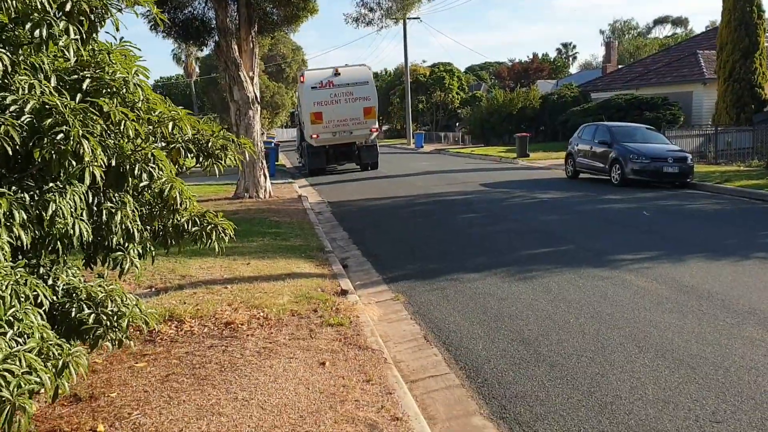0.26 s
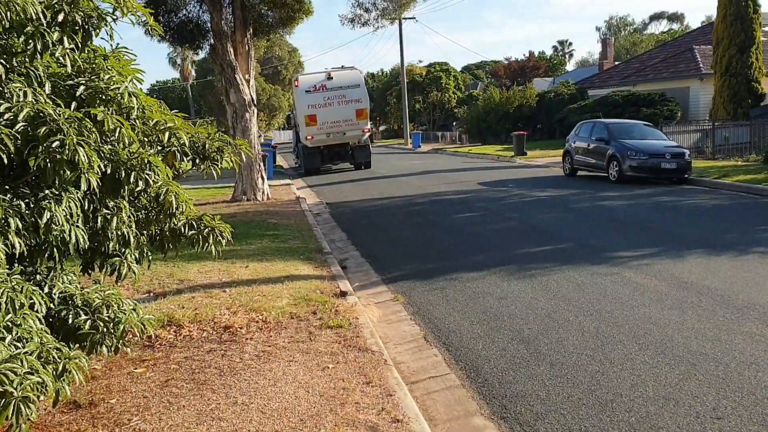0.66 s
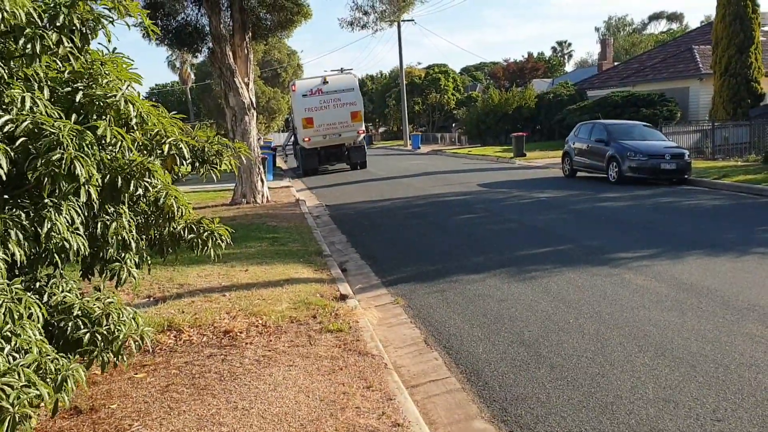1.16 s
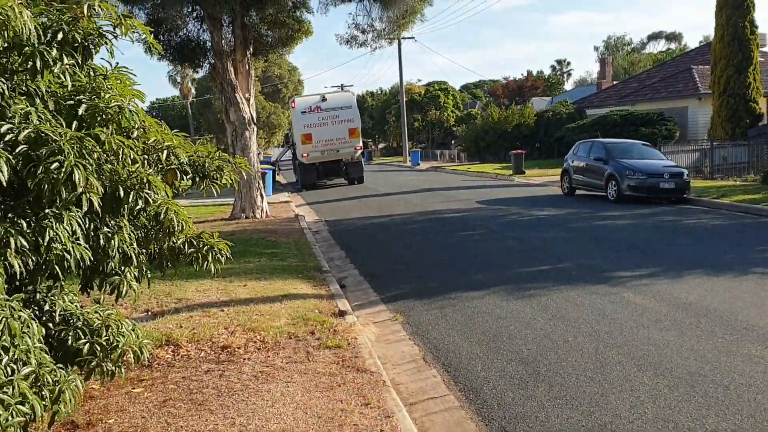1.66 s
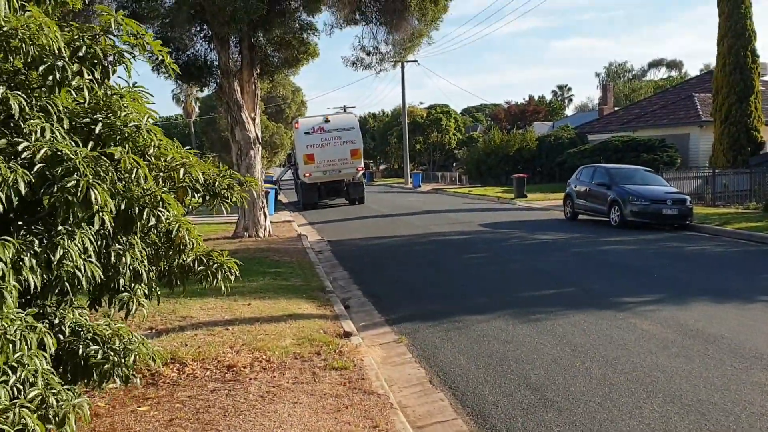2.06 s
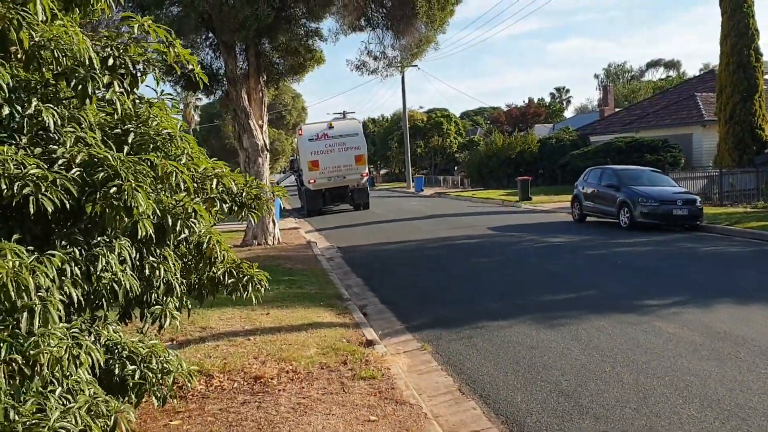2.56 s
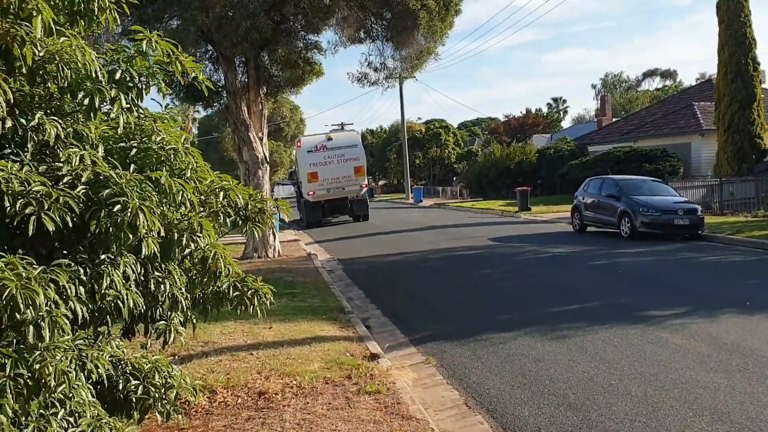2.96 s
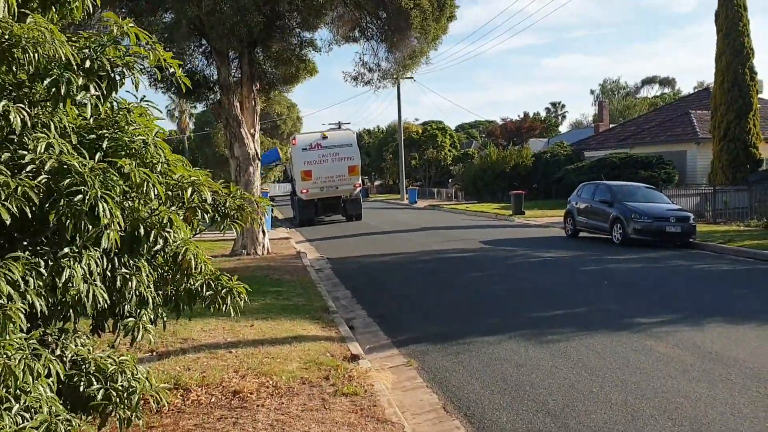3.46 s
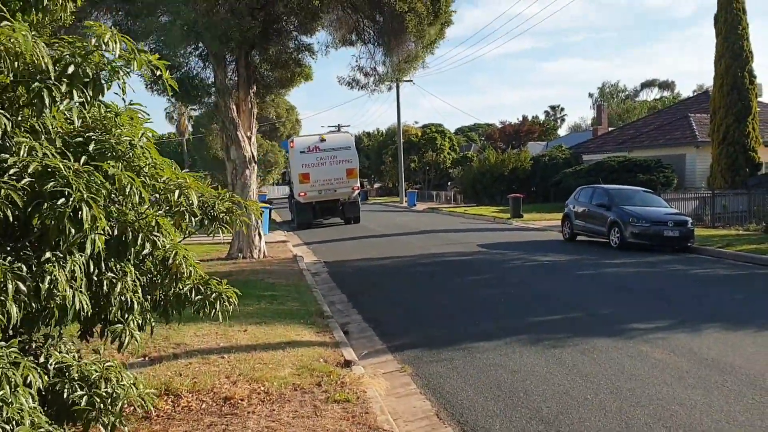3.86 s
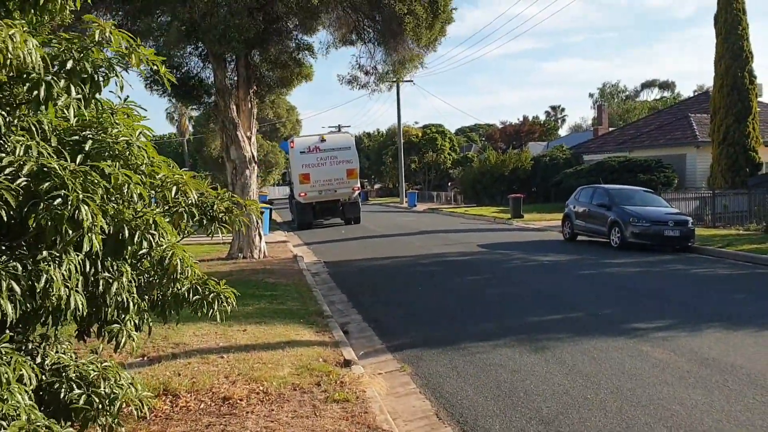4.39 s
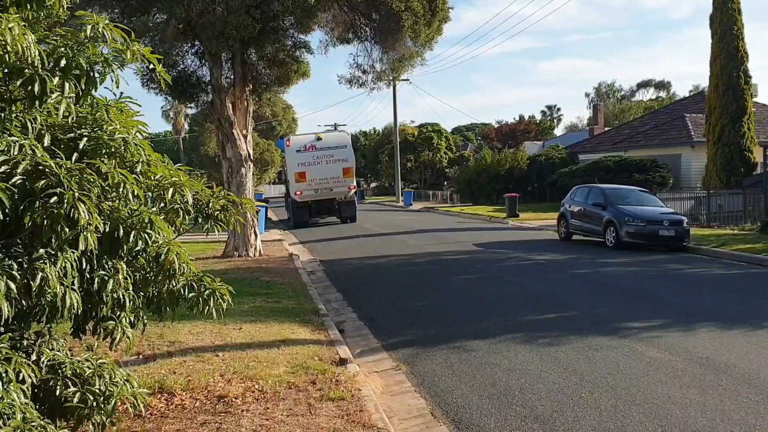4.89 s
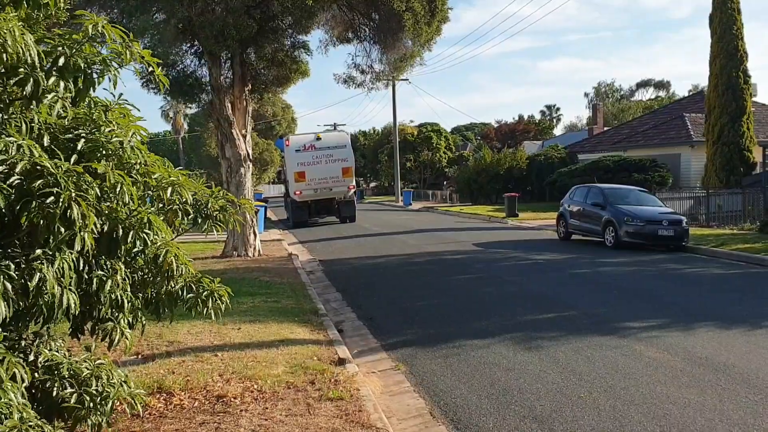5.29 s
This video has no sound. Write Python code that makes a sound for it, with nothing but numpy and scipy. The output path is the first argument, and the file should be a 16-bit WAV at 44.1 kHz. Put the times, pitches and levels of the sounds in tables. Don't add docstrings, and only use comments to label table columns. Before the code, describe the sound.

A refuse truck drops to a diesel idle with thin brake squeals, then its arm clunks a bin, air rushes and a load tumbles into steel.

```python
import sys
import numpy as np
from scipy import signal
from scipy.fft import rfft, irfft, next_fast_len
from scipy.io import wavfile
from scipy.ndimage import uniform_filter1d, map_coordinates

SR = 44100
rng = np.random.default_rng(int(sys.argv[2]) if len(sys.argv) > 2 else 0)


def output_pcm(signal):
    pcm = np.clip(np.atleast_2d(signal).T, -1, 1) * 32767
    wavfile.write(sys.argv[1], SR, np.round(pcm).astype(np.int16))


def voltage_ratio(decibels):
    exponent = np.asarray(decibels, float) / 20
    return 10 ** exponent


N = 243856

# time in seconds, firing rate in Hz, level of the firing note in dB.
ENGINE_SPEED = [(0, 62.65, -39), (.3, 49.8, -49), (.55, 45.55, -40.5), (.7, 44.8, -42), (.82, 42.55, -66),
                (.97, 39.6, -41.5), (1.3, 38.6, -47), (1.55, 35.51, -53), (1.9, 36.02, -39),
                (2.4, 35.82, -45.5), (2.9, 35.9, -39), (3.25, 36.56, -37), (3.7, 37.05, -40.5),
                (4.2, 37.27, -42), (4.5, 37.4, -42), (4.95, 38.52, -38.5), (5.53, 37.96, -47)]
# time in seconds, engine load in dB, exhaust throb in dB.
ENGINE_LOAD = [(0, 5.5, -31.5), (.25, 1.5, -59), (.65, 1, -44), (.85, -1, -58), (1, 0.5, -39.5),
               (1.26, -0.5, -55.5), (1.52, 0, -40.5), (1.9, 1.5, -37), (2.05, 0, -46), (2.76, 4.5, -40),
               (2.95, 4.5, -34), (3.2, 3, -41), (3.5, 4, -35), (3.95, 3, -49), (4.11, 5.5, -44),
               (4.31, 5, -47), (5.05, 2.5, -43.5), (5.53, -1, -55)]
# multiple of the firing rate, level in dB.
UPPER_ORDERS = [(3, -54.5), (4, -51), (5, -63), (6, -54)]
# frequency in Hz, level in dB per Hz.
BOOM_COLOUR = [(53, 0), (90, 5.5), (167, 3.5), (226, -1.5), (262, -7), (325, -15), (420, -19), (550, -15),
               (920, -120)]
# time of full level in seconds, level in dB, then rise before it,
# hold and fall in seconds.
JOLTS = [(.2, -31.5, 0.18, 0.0091, 0.042), (.57, -37.5, 0.24, 0.0064, 0.037),
         (1.71, -35.5, 0.093, .01, 0.4), (2.15, -42, 0.092, 0.011, 0.091), (2.79, -39, 0.25, 0.0075, 0.067),
         (2.96, -28.5, 0.26, 0.0089, 0.059), (3.26, -25, 0.038, 0.0045, 0.11), (3.54, -30, 0.2, 0.04, 0.58),
         (4.04, -24.5, 0.019, 0.17, 0.072), (4.49, -25.5, 0.073, 0.046, 0.13),
         (4.71, -34, 0.069, 0.0044, 0.067), (5.3, -31, 0.18, 0.0085, 0.041),
         (5.41, -33.5, 0.07, 0.0092, 0.1)]
# frequency in Hz, level in dB per Hz.
CLATTER_COLOUR = [(180, -9), (300, 0.5), (476, -4.5), (619, 3), (957, -5), (1090, -4), (2030, -4.5),
                  (2970, -14.5), (3970, -18.5), (7000, -31), (9100, -27.5), (15400, -120)]
# frequency in Hz, width in Hz, level in dB.
BLOCK_MODES = [(736, 130, -9), (1101, 49, 2.5), (1510, 170, -1.5), (2020, 150, -4)]
# time in seconds, frequency in Hz, level in dB.
PUMP_WHINE = [(0, 2030, -67), (.55, 1990, -60), (1.2, 2040, -60.5), (1.45, 2130, -62), (1.8, 1940, -56.5),
              (2.1, 2030, -59.5), (2.43, 2180, -60), (2.75, 2110, -55), (3.2, 2100, -56), (4.2, 2070, -52),
              (5.53, 2150, -58)]
BOOM_DB, CLATTER_DB = -41.5, -46
BOOM_GROWS = 2.12

# time in seconds, frequency in Hz, level in dB.
SQUEALS = [
    [(.87, 7900, -72), (.888, 7905, -44), (.904, 7915, -41), (.93, 7945, -51), (.952, 7975, -38),
     (.968, 7985, -51), (.986, 7995, -46), (1, 7970, -60), (1.17, 8000, -80)],
    [(.96, 8720, -70), (.985, 8730, -56), (1.08, 8860, -52), (1.15, 8880, -49), (1.31, 8735, -63),
     (1.39, 8755, -54), (1.41, 8760, -64)],
    [(1.4, 8730, -64), (1.43, 8715, -47), (1.7, 8795, -56), (1.79, 8795, -53), (1.86, 8815, -63),
     (1.89, 8870, -54), (2, 8885, -65), (2.35, 9085, -63), (2.48, 9130, -75)],
]
# time of full level in seconds, level in dB, frequency in Hz, hold in seconds.
CHIRPS = [(1.3, -50, 8505, .02), (1.18, -55, 13205, .055), (1.31, -72, 10080, .17), (1.65, -73, 10090, .15),
          (.025, -62, 13970, .07), (.862, -52, 8150, .035), (1.36, -70, 11300, .05),
          (1.46, -70, 10080, .15), (2.21, -70, 9850, .04), (2.07, -72, 11450, .03), (1.95, -75, 8620, .15)]
# frequency in Hz, left-right difference in dB.
BRAKE_SEAT = [(7950, 10), (8500, 6), (8800, 4.5), (9100, 7), (13200, 11)]
# frequency in Hz, lead of the left side in radians.
BRAKE_LEAD = [(7950, -2.3), (8500, -1), (8800, -1.9), (9100, -.9), (13200, -2.4)]
SQUEAL_DB = 4.5
CHIRP_RISE_S, CHIRP_FALL_S = 0.018, 0.078

# time of full level in seconds, level in dB, then rise before it, hold and fall in
# seconds.
JETS = [(0, -58, .1, 0.14, 0.26), (.4, -53, 0.3, 0.0071, 0.038), (1.22, -64, 0.23, 0.011, 0.22),
        (1.38, -62, 0.11, 0.39, 0.15), (1.8, -59, 0.022, 0.0032, .04), (2.14, -66, 0.27, .15, .2),
        (2.39, -57, 0.13, 0.13, 0.59), (2.85, -61.5, .2, 0.094, 0.49), (3.16, -51, 0.02, 0.081, .1),
        (3.25, -41, 0.034, 0.0015, 0.03), (3.4, -38.5, 0.2, 0.55, 0.19), (3.48, -43, 0.12, 0.028, 0.37),
        (3.86, -43.5, 0.68, 0.015, 0.067), (4.0, -44, 0.19, 0.31, 0.76), (4.75, -46.5, 0.64, 0.55, 0.95)]
# time of full level in seconds, level in dB, then rise before it, hold and
# fall in seconds.
SPITS = [
    (3.57, -41, 0.15, .05, .12),
    (3.83, -41, 0.11, 0.041, .08),
]
# frequency in Hz, level in dB per Hz.
RUSH_COLOUR = [(1120, -57), (1900, -8), (2010, 2.5), (2400, -4), (5310, 2), (6940, -14), (7850, -12),
               (8600, -14), (9000, -33), (11700, -46), (19800, -120)]
# frequency in Hz, level in dB per Hz.
FIZZ_COLOUR = [(5000, -20), (8800, -5.5), (10700, -1), (11700, -0.5), (12600, -0.5), (13600, 5.5),
               (14100, -3), (14700, -4)]
# frequency in Hz, width in Hz, level in dB.
NOZZLE_MODES = [(2240, 41, -13), (2730, 79, 8), (3360, 220, 5.5), (3800, 460, 4), (5420, 330, -3),
                (6000, 190, -0.5)]
# frequency in Hz, width in Hz, level in dB.
SLIT_MODES = [(12100, 550, 1.5), (13300, 430, -7)]
# time of full level in seconds, level in dB, then rise before it, hold and fall in
# seconds.
PUFFS = [
    (1.35, -59, 0.045, 0.097, 0.17),
    (2.44, -54.5, 0.14, 0.012, .06),
    (2.57, -57, 0.35, 0.025, 0.22),
    (2.76, -66, .1, 0.13, 0.098),
]
# frequency in Hz, width in Hz, level in dB.
VALVE_MODES = [(2180, 71, 9.5), (2800, 640, -7.5), (5730, 33, -4), (7040, 510, -13), (10440, 2400, -19)]
# time of full level in seconds, level in dB, frequency in Hz, hold in seconds.
WHISTLES = [
    (1.34, -61.5, 3320, .11),
    (2.43, -59, 3400, .035),
    (2.52, -60, 3400, .11),
]
LEAK_DB, FIZZ_DB = -65, -4
FIZZ_GROWS = 1.08
WHISTLE_WET_DB = -10

# start in seconds, peak in dB, struck part in Hz, thud in dB, edge in dB.
GRABS = [(1.689, -32, 1914, -19, -16), (1.704, -28.5, 2000, -16, -18), (2.908, -31, 1358, -3, -14),
         (3.148, -31, 2400, -9, -12), (3.231, -22, 1750, -25, -28), (3.2415, -14.5, 1450, -1.5, -25),
         (3.244, -29, 2050, -20, -20), (3.249, -26.5, 766, -6, -18), (3.261, -29, 2080, -15, -20),
         (3.268, -29.5, 1320, 2.5, -5), (3.29, -34, 900, 3, -12), (3.318, -28, 869, -2, -7),
         (3.326, -42, 1160, -15, -7), (3.389, -36, 880, -2, -12), (3.501, -27, 1340, -5.5, -20),
         (4.028, -26.5, 630, -0.5, 2), (4.038, -28.5, 553, 4.5, -4), (4.048, -30.5, 730, -9, -4),
         (4.1, -40, 714, 6, -11), (4.074, -36, 702, 11.5, 1), (4.11, -34.5, 494, 7.5, -5),
         (4.15, -35, 713, 2, 2)]
# start in seconds, peak in dB, struck part in Hz, thud in dB, edge in dB.
FALLS = [(4.31, -32.5, 746, -19, -3), (4.357, -24.5, 620, -19, -16), (4.366, -36, 890, -15, -16),
         (4.375, -32, 1300, -13, -15), (4.402, -31, 1280, -7, -17), (4.426, -28, 2120, -7, 1.5),
         (4.44, -28, 688, -9, -5), (4.457, -27, 1920, -3, -10), (4.466, -29, 1380, 6, -17),
         (4.478, -30.5, 802, 6.5, -18), (4.514, -22.5, 1510, 5.5, -29), (4.535, -27.5, 1700, 1.5, 7.5),
         (4.544, -31, 1710, -3, 5.5), (4.553, -19.5, 2230, -4, -15), (4.572, -34, 1710, -2, -15),
         (4.604, -30, 1510, -10, -15.5), (4.629, -35.5, 1980, 7, -16), (4.687, -30.5, 2020, 9, -16.5),
         (5.11, -36.5, 788, 7, -13)]
# frequency in Hz, width in Hz, level in dB.
ARM_MODES = [(480, 200, -2), (670, 280, 0), (900, 300, 2), (1328, 420, -3), (1650, 350, -5),
             (1990, 350, -5), (2830, 300, -14)]
# frequency in Hz, width in Hz, level in dB.
THUD_MODES = [(121.5, 58, -7), (154.5, 19.6, 1.5), (199, 81, -10.5), (217, 23, -23), (283.7, 35, 2)]
# frequency in Hz, width in Hz, level in dB.
EDGE_MODES = [(3950, 700, 0), (5700, 900, -16)]
# time of full level in seconds, level in dB, then rise before it, hold
# and fall in seconds.
TUMBLE = [
    (3.246, -17, 0.0086, .001, 0.01),
    (3.26, -29.5, 0.02, .001, 0.045),
    (3.512, -34.5, 0.11, .001, 0.28),
    (4.03, -36, 0.0062, 0.04, 0.14),
    (4.32, -36, 0.031, 0.012, 0.061),
    (4.45, -26.5, 0.038, 0.0094, 0.19),
    (4.436, -31.5, 0.24, 0.033, 0.183),
    (4.545, -26, 0.09, 0.013, 0.12),
    (4.69, -35.5, 0.081, 0.011, 0.25),
]
# frequency in Hz, level in dB per Hz.
HOPPER_COLOUR = [(180, -3.5), (300, -5.5), (521, -12), (661, -5), (999, -14.5), (1550, -3), (2150, -15),
                 (3050, -17), (3820, -24), (6000, -32), (7800, -71), (13200, -120)]
# time of full level in seconds, level in dB, frequency in Hz, hold in
# seconds, left-right difference in dB.
DRUM = [
    (4.47, -25.5, 152, 0.058, -5),
    (4.503, -26.5, 119.3, 0.013, -20),
    (4.539, -30, 163.4, 0.0345, -20),
    (4.555, -37, 150, 0.03, -3),
]
SIDE_PANEL_HZ, FLOOR_PANEL_HZ = 224, 155.9
DRUM_RISE_S, DRUM_FALL_S = 0.027, 0.025
DRUM_FLUTTER_HZ, DRUM_SHIMMER_DB = 15, 2

# start in seconds, peak in dB.
CRACKS = [
    (3.231, -35),
    (3.2417, -17.5),
    (3.255, -35),
    (3.268, -26),
    (4.028, -25.5),
    (4.456, -23.5),
    (4.489, -27),
    (4.539, -32.5),
]
# frequency in Hz, level in dB per Hz.
CRACK_COLOUR = [(1200, -34), (2500, 1), (4000, -2), (6000, -5.5), (6800, -18), (8000, -20), (12000, -11),
                (15000, -22)]
CRACK_T60_S = 0.023

# time of full level in seconds,
# level in dB, frequency in Hz, hold in seconds, left-right difference in dB.
THRUMS = [
    (4.07, -28.5, 82, 0.095, -1),
    (3, -37, 84, 0.058, 3),
    (6.5, -40, 300, .015, -8),
    (5.46, -50.5, 370, .015, -13),
    (5.11, -49.5, 520, 0.008, -1),
    (3.25, -31.5, 192, .04, 3),
    (4.542, -42, 3950, 0.017, 2),
    (4.52, -34, 160, 0.038, -12),
]

# start in seconds, peak in dB, frequency in Hz, 60 dB fade time in seconds.
TICKS = [
    (.0236, -27, 2200, .0016),
    (.0236, -30, 4200, .0014),
    (0.358, -38, 3100, .0012),
    (0.5644, -38, 5800, .0016),
    (0.5646, -35, 3600, .0012),
    (0.5643, -40, 10500, .0006),
    (1.8, -41, 11550, .0008),
]

# time of the peak in seconds, level in dB, rise before and fall after it in seconds,
# left-right difference in dB.
GUSTS = [(0, -28, 0.24, -1), (.09, -29, 0.054, -4), (.22, -32, 0.091, -15), (0.349, -31, 0.085, -13),
         (0.429, -26, 0.043, -18), (.61, -43, 0.065, 3), (1.4, -40, 0.19, -5), (1.82, -36.5, 0.3, -18),
         (2.02, -43, 0.21, -23.5), (2.28, -35, 0.036, -6), (2.37, -40.5, 0.12, -22), (3.03, -36, 0.11, -10),
         (3.42, -40.5, 0.41, -8), (3.59, -29, 0.16, -7), (3.847, -27, 0.063, 2), (4.1, -40.5, 0.3, 11.5),
         (4.39, -38, 0.1, 1), (4.47, -24.5, 0.13, -4), (4.53, -26, 0.13, -12), (4.62, -25.5, 0.045, -17),
         (4.671, -22, 0.03, 18), (4.7, -25.5, .04, -14), (4.745, -24.5, 0.13, -2.5),
         (5.15, -42.5, 0.38, -5), (5.3, -24.5, 0.084, -3.5), (5.427, -25, 0.022, -9), (5.46, -44, .04, 20),
         (5.53, -30, 0.1, 14)]
# frequency in Hz, level in dB per Hz.
GUST_COLOUR = [(20, -49), (45, 11), (75, 12), (130, 2), (200, -6), (400, -24.5), (900, -47)]
BREEZE_DB, BREEZE_PAN_DB = -58.5, -2
EDDY_SAMPLES = 1200

# frequency in Hz, 60 dB fade time in seconds.
STREET_FADE = [(150, 0.34), (1500, 0.94), (8000, 0.65)]
# frequency in Hz, left-right likeness from 0 to 1.
ALIKE = [(60, .8), (200, .9), (680, .82), (1250, .45), (2290, .62), (4200, .56), (8000, .45), (14000, .6)]
# frequency in Hz, lead of the left side in radians.
LEAD = [(0, 0), (2840, .2), (3270, -.8), (3880, -5.6), (4820, -3.8), (5940, -5.6), (7410, -5.6),
        (8350, -3.6), (9470, -2), (10600, -.5), (12000, .8), (14300, 1.6)]
# frequency in Hz, left-right difference in dB.
LEAN = [(60, 0), (150, 0.5), (250, -0.5), (420, -1), (920, 0.5), (2290, 0.0), (5680, -3), (14100, -5.5)]
HALVES = np.array([[0.5], [-0.5]])


def unit(x):
    return x / np.sqrt(np.mean(x ** 2) + 1e-20)


def along(points, hz):
    f, v = np.transpose(points)
    return np.interp(np.log(hz + 1), np.log(f + 1), v)


def colour(points):
    return lambda hz: voltage_ratio(along(points, hz))


def pan(db):
    return voltage_ratio(db * HALVES)


def curves(rows):
    s, *columns = np.transpose(rows)
    return [np.interp(np.arange(N) / SR, s, column) for column in columns]


def gate(rows):
    t = np.arange(N) / SR
    to_nearest_end = np.minimum(t - rows[0][0], rows[-1][0] - t)
    return np.clip(to_nearest_end / 0.015, 0, 1)


def wobble(rate):
    knots = rng.standard_normal(int(N * rate / SR) + 4)
    return map_coordinates(knots, [np.arange(N) * rate / SR])


def swell(s, db, rise_s, hold_s, fall_s):
    t = np.arange(N) / SR - s
    near = (t > -4 * rise_s) & (t < hold_s + 4 * fall_s)
    before = -t[near] / rise_s
    after = (t[near] - hold_s) / fall_s
    gain = np.zeros(N)
    gain[near] = voltage_ratio(db - 20 * np.maximum(np.maximum(before, after), 0))
    return gain


def swells(rows, floor_db=-120):
    return 10 * np.log10(voltage_ratio(floor_db) ** 2 + sum(swell(*row) ** 2 for row in rows))


def tone(hz, gain, flutter_hz, shimmer_db):
    turn = 2 * np.pi * np.cumsum(hz + flutter_hz * wobble(150)) / SR
    return gain * voltage_ratio(3.5 + shimmer_db * wobble(45)) * np.sin(turn)


def filtered(x, response):
    pad = 2048
    x = np.pad(x, [(0, 0), (pad, pad)], mode="reflect")
    m = next_fast_len(N + SR // 2)
    return irfft(rfft(x, m) * response(np.fft.rfftfreq(m, 1 / SR)), m)[..., pad:pad + N]


def modes(table, f):
    total = 0
    for k, (centre, width, db) in enumerate(table):
        damping = 1j * f * width
        total = total + (-1) ** k * voltage_ratio(db) * damping / (centre * centre - f * f + damping + 1e-9)
    return total


def rush(gain, patchy_db, ports=False):
    z = signal.stft(rng.standard_normal((2, N)), nperseg=512)[2]
    field = uniform_filter1d(rng.standard_normal(z.shape[1:]), size=5, axis=0)
    field = uniform_filter1d(field, size=9, axis=1)
    patchy = signal.istft(z * voltage_ratio(patchy_db * unit(field)), nperseg=512)[1][:, :N]
    pair = filtered(patchy, gain)
    return unit(pair if ports else spread(pair))


def spread(pair):
    def shares(hz):
        turn = np.arccos(np.clip(along(ALIKE, hz), 0, 1)) / 2
        return np.array([np.cos(turn), np.sin(turn)])
    mid, side = filtered(pair, shares)
    return arrive(np.array([mid + side, mid - side]), LEAD)


def arrive(x, lead):
    return filtered(x, lambda hz: np.exp(1j * HALVES * along(lead, hz)))


def street(x, wet_db, lead=LEAD):
    hz, t, z = signal.stft(rng.standard_normal((2, SR // 2)), SR, nperseg=256)
    fade = voltage_ratio(-60 * t / along(STREET_FADE, hz)[:, None])
    tail = signal.istft(z * fade, SR, nperseg=256)[1]
    tail = tail / np.linalg.norm(tail[0])
    delayed = np.pad(x, (500, 0))[None]
    echo = signal.fftconvolve(delayed, tail, axes=1)[:, :N]
    return arrive(x[None], lead) + voltage_ratio(wet_db) * echo


def engine():
    firing_hz, first_db = curves(ENGINE_SPEED)
    load_db, second_db = curves(ENGINE_LOAD)
    turn = 2 * np.pi * np.cumsum(firing_hz * (1 + 0.012 * wobble(7))) / SR
    orders = voltage_ratio(first_db + 1.6 * wobble(12.0)) * np.sin(turn)
    orders += voltage_ratio(second_db + 2.4 * wobble(14)) * np.sin(2 * turn + 0.69)
    for k, db in UPPER_ORDERS:
        orders += voltage_ratio(db + 2.4 * wobble(3.83) - 1.8 * (firing_hz - 34.0)) * np.sin(k * turn)

    beat = np.cos(turn) + 0.071 * np.cos(turn / 3)
    boom_db = swells(JOLTS, floor_db=BOOM_DB + BOOM_GROWS * load_db)
    boom = rush(colour(BOOM_COLOUR), patchy_db=0.5)
    boom = unit(voltage_ratio(0.66 * wobble(18) + 0.49 * beat) * boom)

    clatter_db = CLATTER_DB + load_db
    block = rush(lambda f: colour(CLATTER_COLOUR)(f) * (1 + 0.65 * abs(modes(BLOCK_MODES, f))), patchy_db=1.5)
    clatter = unit(voltage_ratio(0.22 * beat + 0.66 * wobble(24.71)) * block)

    pump_hz, pump_db = curves(PUMP_WHINE)
    pump = tone(pump_hz + 20 * wobble(10), voltage_ratio(pump_db), flutter_hz=90, shimmer_db=3)
    noise = voltage_ratio(boom_db - 4.5) * boom + voltage_ratio(clatter_db - 2.0) * clatter
    return np.sqrt(2) * orders + street(pump, wet_db=-4) + noise


def brakes():
    out = np.zeros(N)
    for rows in SQUEALS:
        hz, db = curves(rows)
        out += tone(hz, gate(rows) * voltage_ratio(db + SQUEAL_DB), flutter_hz=11, shimmer_db=1.5)
    for s, db, hz, hold in CHIRPS:
        out += tone(hz, swell(s, db, CHIRP_RISE_S, hold, CHIRP_FALL_S), flutter_hz=18, shimmer_db=1.5)
    heard = street(out, wet_db=-16, lead=BRAKE_LEAD)
    return filtered(heard, lambda hz: pan(along(BRAKE_SEAT, hz)))


def air():
    rush_db = swells(JETS, floor_db=LEAK_DB)
    fizz_db = swells(SPITS, floor_db=FIZZ_DB - 51.0 + FIZZ_GROWS * (rush_db + 50))
    jet = rush(lambda f: colour(RUSH_COLOUR)(f) * (1 + abs(modes(NOZZLE_MODES, f))), patchy_db=2.0)
    fizz = rush(lambda f: colour(FIZZ_COLOUR)(f) * (1 + abs(modes(SLIT_MODES, f))), patchy_db=2.0)
    puff = voltage_ratio(swells(PUFFS)) * rush(lambda f: modes(VALVE_MODES, f), patchy_db=1.5)
    whistle = np.zeros(N)
    for s, db, hz, hold in WHISTLES:
        whistle += tone(hz, swell(s, db, 0.02, hold, 0.04), flutter_hz=40, shimmer_db=2)
    whistle = street(whistle, wet_db=WHISTLE_WET_DB, lead=[(3300, 0.23)])
    return voltage_ratio(rush_db - 0.37) * jet + voltage_ratio(fizz_db + 1.7) * fizz + voltage_ratio(9.5) * puff + whistle


def blows():
    size = 8192
    t, f = np.arange(size) / SR, np.fft.rfftfreq(size, 1 / SR)
    fade = voltage_ratio(-60 * t / np.array([[0.045], [0.05], [0.08]]))
    onset = 1 - np.exp(-t / np.array([[0.0015], [0.003], [0.005]]))
    hits = np.zeros(N + size)
    knocks = [(*row, SIDE_PANEL_HZ) for row in GRABS] + [(*row, FLOOR_PANEL_HZ) for row in FALLS]
    for s, db, hz, thud_db, edge_db, panel_hz in knocks:
        burst = rng.standard_normal((3, size)) * fade * onset
        burst[1] = abs(burst[1]) * voltage_ratio(-60 * t / 0.009)
        arm = modes([(hz, 0.45 * hz, 0)], f) ** 2 * modes(ARM_MODES, f)
        panel = modes([(panel_hz, 0.27 * panel_hz, 0)], f) * modes(THUD_MODES, f)
        edge = modes(EDGE_MODES, f) ** 2
        parts = irfft(rfft(burst) * [arm, panel, edge], size)
        parts /= abs(parts).max(axis=1, keepdims=True)
        hits[round(s * SR):][:size] += voltage_ratio(db + np.array([-1.5, thud_db - 2.5, edge_db - 5.5])) @ parts
    return street(hits[:N], wet_db=-3.5)


def tumbling_load():
    rattle = unit(voltage_ratio(1.7 * wobble(60)) * rush(colour(HOPPER_COLOUR), patchy_db=2.0))
    drum = np.zeros((2, N))
    for s, db, hz, hold, pan_db in DRUM:
        gain = swell(s, db, DRUM_RISE_S, hold, DRUM_FALL_S)
        drum += pan(pan_db) * tone(hz, gain, DRUM_FLUTTER_HZ, DRUM_SHIMMER_DB)
    return drum + voltage_ratio(-2.5) * voltage_ratio(swells(TUMBLE)) * rattle


def cracks():
    out, t = np.zeros(N + SR), np.arange(SR // 20) / SR
    for s, db in CRACKS:
        out[round(s * SR):][:len(t)] += voltage_ratio(db - 60 * t / CRACK_T60_S) * rng.standard_normal(len(t))
    return street(filtered(out[None, :N], colour(CRACK_COLOUR))[0], wet_db=-3.0)


def body():
    out = np.zeros((2, N))
    for s, db, hz, hold, pan_db in THRUMS:
        gain = swell(s, db, 0.017, hold, 0.038)
        out += pan(pan_db) * tone(hz, gain, flutter_hz=0.1002 * hz, shimmer_db=DRUM_SHIMMER_DB)
    return out


def ticks():
    out, t = np.zeros(N + SR), np.arange(SR // 100) / SR
    for s, db, hz, t60 in TICKS:
        shape = voltage_ratio(db + 14.0 - 60 * t / t60) * (1 - np.exp(-t / 0.00026))
        out[round(s * SR):][:len(t)] += shape * np.sin(2 * np.pi * hz * t)
    return street(out[:N], wet_db=-18, lead=[(3300, 0)])


def wind():
    power = (voltage_ratio(BREEZE_DB) * pan(BREEZE_PAN_DB)) ** 2
    for s, db, span, pan_db in GUSTS:
        sides = pan(1.2 * pan_db) / np.sqrt(np.cosh(0.13 * pan_db))
        power = power + (swell(s, db, span, 0, span) * sides) ** 2
    eddies = rush(colour(GUST_COLOUR), patchy_db=2.0, ports=True)
    eddies /= np.sqrt(abs(uniform_filter1d(eddies ** 2, size=EDDY_SAMPLES)) + 0.14)
    lumps = voltage_ratio(1.02 * np.array([wobble(11), wobble(38)]))
    return voltage_ratio(1.5) * np.sqrt(power) * unit(lumps * eddies)


def scene():
    truck = engine() + brakes() + air()
    emptying = blows() + tumbling_load() + cracks() + body()
    return truck + emptying + ticks() + wind()


def top_cut(x):
    return signal.sosfilt(signal.butter(12, 14740, fs=SR, output="sos"), x)


def record(dry):
    def port(hz):
        bass_cut = 1 / np.sqrt(1 + (31 / (hz + 1)) ** 8)
        return pan(along(LEAN, hz)) * (hz < 14740) * bass_cut
    mix = filtered(dry, port)
    return top_cut(mix)


dry = scene()
out = record(dry)
output_pcm(out)
```